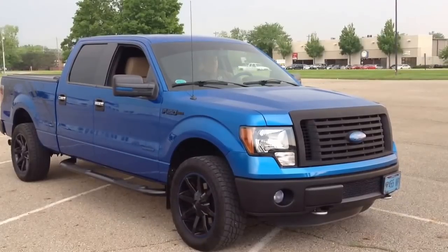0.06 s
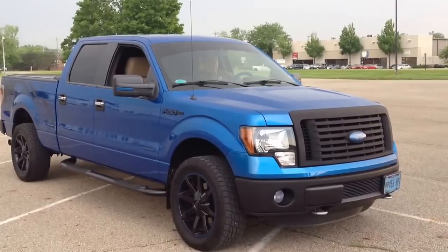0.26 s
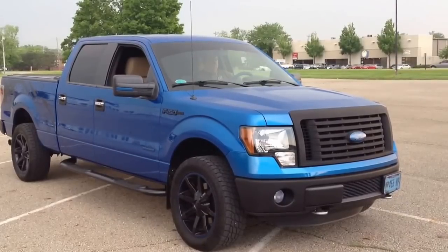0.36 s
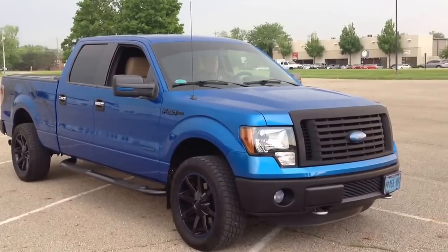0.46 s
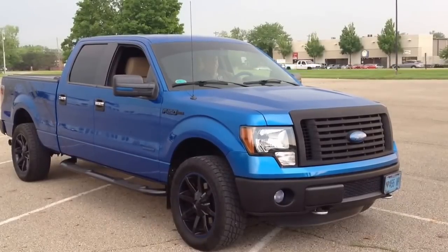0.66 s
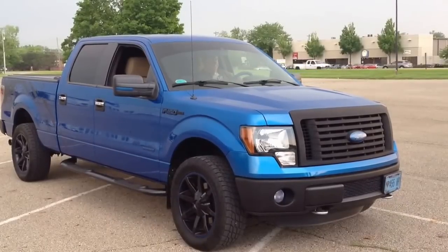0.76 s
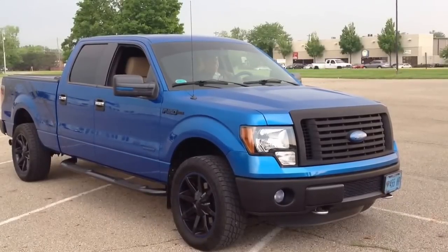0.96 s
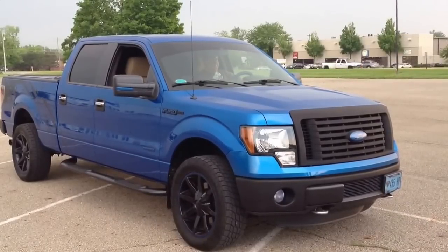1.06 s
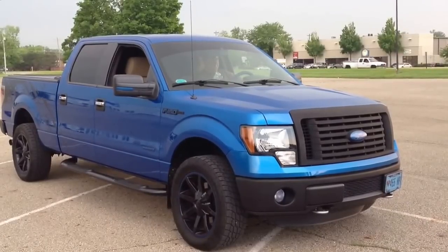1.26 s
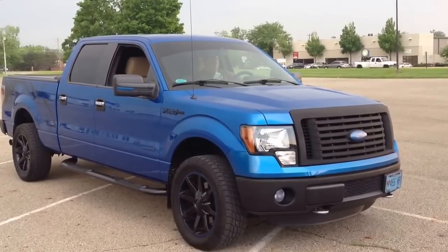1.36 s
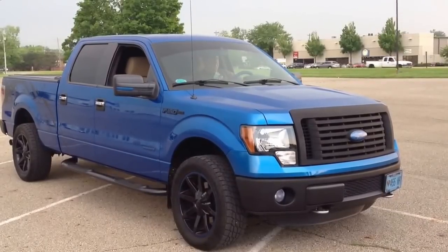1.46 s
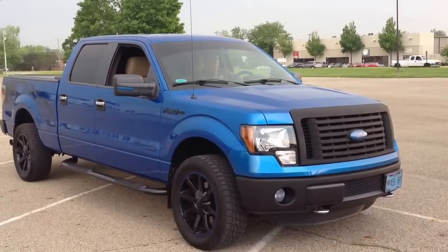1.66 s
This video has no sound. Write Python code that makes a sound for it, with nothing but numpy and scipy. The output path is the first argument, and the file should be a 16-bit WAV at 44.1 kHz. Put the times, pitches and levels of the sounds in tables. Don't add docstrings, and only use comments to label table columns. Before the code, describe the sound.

Turbocharged truck engine revs up from idle, snaps shut, pops, and releases a loud fading hiss

```python
import sys
import numpy as np
from scipy import signal
from scipy.fft import rfft, irfft, next_fast_len
from scipy.io import wavfile
from scipy.ndimage import uniform_filter1d, map_coordinates

SR = 44100
rng = np.random.default_rng(int(sys.argv[2]) if len(sys.argv) > 2 else 0)


def boost_factor(decibels):
    exponent = np.asarray(decibels, float) / 20
    return 10 ** exponent


def output_pcm(signal):
    pcm = np.clip(np.atleast_2d(signal).T, -1, 1) * 32767
    wavfile.write(sys.argv[1], SR, np.round(pcm).astype(np.int16))


N = 74970
T = np.arange(N) / SR
SHUT_S = .745


def unit(x):
    return x / np.sqrt(np.mean(x ** 2) + 1e-20)


def along(points, hz):
    f, v = np.transpose(points)
    return np.interp(np.log(hz + 1), np.log(f + 1), v)


def curve(rows):
    return np.interp(T, *np.transpose(rows))


def wobble(rate_hz):
    knots = rng.standard_normal(int(N / SR * 200))
    return map_coordinates(knots, [np.arange(N) * min(rate_hz, 150) / SR])


def tone(cycles, phase_rad=0):
    return np.sqrt(2) * np.sin(2 * np.pi * cycles + phase_rad)


def filtered(x, response):
    m = next_fast_len(N + SR // 2)
    return irfft(rfft(x, m) * response(np.fft.rfftfreq(m, 1 / SR)), m)[:N]


def rush(spectrum, peaks=(), patchy_db=2):
    z = signal.stft(rng.standard_normal(N), nperseg=512)[2]
    field = uniform_filter1d(rng.standard_normal(z.shape), 5, 0)
    field = uniform_filter1d(field, 8, 1)
    x = signal.istft(z * boost_factor(patchy_db * unit(field)), nperseg=512)[1][:N]

    def response(f):
        lift_db = sum(db / (1 + (2 * (f - c) / w) ** 2) for c, w, db in peaks)
        inside = (f > spectrum[0][0]) * (f < spectrum[-1][0])
        return boost_factor(along(spectrum, f) + lift_db) * inside

    return unit(filtered(x, response))


def breeze():
    level_db = -58 + 2.5 * wobble(6)
    return boost_factor(level_db) * rush([(15, -8), (30, 0), (70, 4), (90, -20)], patchy_db=5.5)


def lot(truck):
    t60_s, level_db = .25, -17
    t = np.arange(SR // 2) / SR
    tail = rng.standard_normal(len(t)) * boost_factor(-60 * t / t60_s) * (t > .008)
    return boost_factor(level_db) * signal.fftconvolve(truck, tail / np.linalg.norm(tail))[:N]


def clatter():
    idle_hz, rise_hz_per_s, level_db = 2880, 1600, -48.5
    carrier = np.sin(2 * np.pi * (idle_hz * T + rise_hz_per_s * T ** 2 / 2))
    band = rush([(1, -5), (120, 5), (300, -11)], patchy_db=0.0) * carrier
    return boost_factor(level_db) * np.clip((.4 - T) / 0.14, 0, 1) * band


def belt_whine(turns):
    order, level_db, from_s = 14.6, -34, 0.79
    fade = np.clip((T - from_s) / 0.068, 0, 1)
    return boost_factor(level_db + 2.5 * wobble(18)) * fade * np.sin(2 * np.pi * order * turns + 0.34 * wobble(39.8))


# Hz, level in dB per Hz.
RUMBLE_SPECTRUM = [(60, -20), (90, -1), (140, 8), (260, -11), (400, -3), (600, -34)]


def rumble(load_db):
    return boost_factor(-29 + 0.1 * load_db + 0.99 * wobble(9)) * rush(RUMBLE_SPECTRUM, patchy_db=3.0)


# Hz, level in dB per Hz.
INTAKE_SPECTRUM = [(2060, -25), (3500, -4), (4060, -16), (4770, -0.5), (5820, -0.5), (9210, -20.5),
                   (14600, -23), (15400, -37)]


def intake(turns, speed_db, load_db):
    level_db = -32.5 + 1.27 * speed_db + 0.29 * load_db + 0.3 * wobble(13.5)
    gate = 1 + .3 * 0.12 * np.cos(2 * np.pi * turns)
    return boost_factor(level_db) * gate * rush(INTAKE_SPECTRUM, patchy_db=1.0)


# Hz, level in dB per Hz.
ROAR_SPECTRUM = [(240, -5), (400, -14.5), (537, -4), (694, -3.5), (951, -9.5), (1260, -7.5), (1680, -9.5),
                 (1860, -3), (4200, -28), (5460, -46), (9240, -120)]
# centre in Hz, width in Hz, lift in dB.
BAY_PANELS = [(630, 360, 3), (1380, 160, 1), (1710, 73, 1), (2330, 54, 0)]


def roar(turns, speed_db, load_db):
    level_db = -20 + 0.72 * speed_db + 0.42 * load_db + 0.63 * wobble(13.7)
    gate = 1 + 0.12 * np.cos(2 * np.pi * turns)
    return boost_factor(level_db) * gate * rush(ROAR_SPECTRUM, BAY_PANELS, patchy_db=1.0)


def block_hum(turns, speed_db):
    growth = 2 + 5 * (T < SHUT_S)
    return boost_factor(-27 + growth * speed_db + 0.46 * wobble(10.9)) * tone(turns)


def idle_drone():
    hz, level_db, until_s = 140.4, -26, 0.227
    fade = np.clip((until_s - T) / 0.076, 0, 1)
    return boost_factor(level_db + 1.4 * wobble(18)) * fade * tone(hz * T, .5 * wobble(18))


# Hz, gain in dB.
PIPE_GAIN = [(65, -35), (90, -35), (112, -11), (140, 5), (175, -4.5), (205, -1), (295, -5), (335, -17.5),
             (480, -24)]


def pipe(hz):
    octaves_over = np.log2(np.maximum(hz / PIPE_GAIN[-1][0], 1))
    return boost_factor(along(PIPE_GAIN, hz) - 13 * octaves_over)


def firing_orders(hz, turns, pull):
    scatter_db, drift_rad, third_loss_db = 5, 1.1, 6
    slack = 1 - pull
    total = 0
    for k in range(1, 15):
        dull_db = third_loss_db * (k == 3) * (T > SHUT_S + .008)
        gain = boost_factor(scatter_db * slack * wobble(21.97) - dull_db)
        drift = drift_rad * slack ** 2 * wobble(24.9)
        total = total + pipe(k * hz) * gain * np.cos(k * (2 * np.pi * turns - .9) + drift)
    return total


def uneven_firings(hz, turns, load_db, pull):
    cylinder_db, coast_rough, pull_rough = -24, .3, .03
    at = np.flatnonzero(np.diff(turns.astype(int)))
    firing = turns.astype(int)[at]
    chance, cylinders = rng.standard_normal(400), rng.standard_normal(6)
    rough = coast_rough + (pull_rough - coast_rough) * pull[at]
    uneven = boost_factor(cylinder_db) * cylinders[firing % 6] + chance[firing] * rough
    pulses = np.zeros(N)
    pulses[at] = SR / hz[at] * boost_factor(load_db[at]) * uneven
    return filtered(pulses, pipe)


def exhaust(hz, turns, load_db):
    pull = np.clip(boost_factor(load_db), 0, 1)
    orders = np.sqrt(2) * boost_factor(load_db) * firing_orders(hz, turns, pull)
    return boost_factor(-9) * (orders + uneven_firings(hz, turns, load_db, pull))


# time in seconds, firings per second.
FIRING_RATE = [(0, 35), (.15, 34.6), (.21, 38), (.3, 48), (.39, 59.4), (.478, 71.4), (.554, 83.3),
               (.62, 92.5), (.676, 100.4), (.745, 106.5), (.8, 103), (.86, 101), (1.06, 98), (1.168, 95.4),
               (1.324, 91.5), (1.542, 86), (1.7, 82.5)]
# time in seconds, load in dB.
COMBUSTION = [(0, -36), (.1, -24.5), (.2, -21.5), (.28, -21), (.35, -12.5), (.47, -7.5), (.55, -3.5),
              (.67, 3), (.742, 2), (.756, -18.5), (.86, -13.5), (1.03, -16.5), (1.3, -18), (1.45, -19),
              (1.7, -19.5)]


def engine():
    hz, load_db = curve(FIRING_RATE), curve(COMBUSTION)
    turns = np.cumsum(hz) / SR
    speed_db = 20 * np.log10(hz / 100)
    low = exhaust(hz, turns, load_db) + block_hum(turns, speed_db) + idle_drone()
    air = roar(turns, speed_db, load_db) + intake(turns, speed_db, load_db)
    mechanical = rumble(load_db) + clatter() + belt_whine(turns)
    return low + air + mechanical


# time in seconds, peak in dB.
LATE_BURNS = [
    (.875, -9),
    (.887, -10),
    (.906, -14),
    (.925, -12),
    (.944, -13),
    (.964, -16),
]


def pops():
    level_db, ring_s, crack_db = -1, .018, -14
    modes = [(140, 0), (193.5, 4), (266.5, -3), (364, -13)]  # Hz, dB
    x, t = np.zeros(N + SR), np.arange(SR // 10) / SR
    envelope = np.exp(-t / ring_s) * (1 - np.exp(-t / 0.0022))
    chance = rng.standard_normal((len(LATE_BURNS), len(modes)))
    for (s, db), row in zip(LATE_BURNS, chance):
        ring = sum(boost_factor(m_db + 2 * u) * np.sin(2 * np.pi * hz * t) for (hz, m_db), u in zip(modes, row))
        noise = uniform_filter1d(rng.standard_normal(len(t)), size=24) * 4
        crack = boost_factor(crack_db) * noise * np.exp(-t / 0.0041)
        x[round(s * SR):][:len(t)] -= boost_factor(db + level_db) * (ring * envelope + crack)
    return x[:N]


# Hz, level in dB per Hz.
WHOOSH_SPECTRUM = [(1470, -36), (2500, 2.5), (4040, -18.5), (5270, -7.5), (6770, -10.5), (11400, -27.5),
                   (15400, -29)]


def boost():
    rise_s, fall_s, whoosh_db, whistle_hz, whistle_db = 0.048, 0.0078, -23, 1200, -22.5
    t = T - SHUT_S
    swell = np.exp(np.where(t < 0, t / rise_s, -t / fall_s))
    bump = np.exp(-(t + 0.018) ** 4 / 0.02 ** 4)
    whistle = boost_factor(whistle_db) * bump * np.sin(2 * np.pi * whistle_hz * t + 0.24 * wobble(42.6))
    return swell * boost_factor(whoosh_db) * rush(WHOOSH_SPECTRUM, patchy_db=3.0) + whistle


# time in seconds, flow in dB.
VALVE_FLOW = [
    (.826, -45),
    (.836, -12.5),
    (.87, -4),
    (.9, -0.5),
    (.95, 0.5),
    (1.03, 0),
    (1.17, -5.5),
    (1.33, -14),
    (1.7, -21.5),
]
# Hz, level in dB per Hz.
JET_SPECTRUM = [(240, -47), (400, -22), (468, -39), (584, -4.5), (957, -12.5), (2070, 1.5), (3220, -12),
                (6330, -0.5), (9000, -22), (11700, -45), (19800, -120)]
# centre in Hz, width in Hz, lift in dB.
DUCT_MODES = [(608, 140, 10.1), (1400, 210, 8.6), (2035, 52, 7), (2518, 102, 11), (4940, 97, 4.8),
              (5820, 45, 2.5), (6770, 81, 6.6)]
# Hz, level in dB per Hz.
FIZZ_SPECTRUM = [(4410, -42), (7500, 0), (9540, -5), (13700, -1), (14700, 1), (15400, -14.5)]


def relief_valve():
    flow_db = curve(VALVE_FLOW)
    flutter_db = .6 * wobble(9) + .4 * wobble(35)
    jet = boost_factor(-18.5 + flow_db + flutter_db) * rush(JET_SPECTRUM, DUCT_MODES, patchy_db=1.5)
    fizz = boost_factor(-32.5 + 0.83 * flow_db + flutter_db) * rush(FIZZ_SPECTRUM, patchy_db=1.4)
    return jet + fizz * (T > SHUT_S + .082)


def scene():
    truck = engine() + pops() + relief_valve() + boost()
    return (truck + lot(truck))[None]


def band_limit(x):
    return signal.sosfilt(signal.butter(12, 15550, fs=SR, output="sos"), x)


def record(dry):
    limit, bass_hz, top_hz = 1.0, 78, 15540
    x = dry[0] / (1 + np.abs(dry[0] / limit) ** 6) ** (1 / 6)
    x = filtered(x, lambda f: (f < top_hz) / np.sqrt(1 + (bass_hz / (f + 1)) ** 14))
    return band_limit((x + breeze())[None])


dry = scene()
out = record(dry)
output_pcm(out)
```